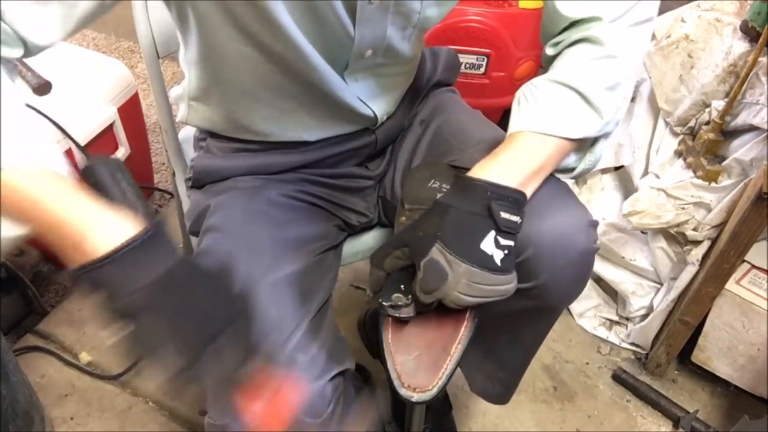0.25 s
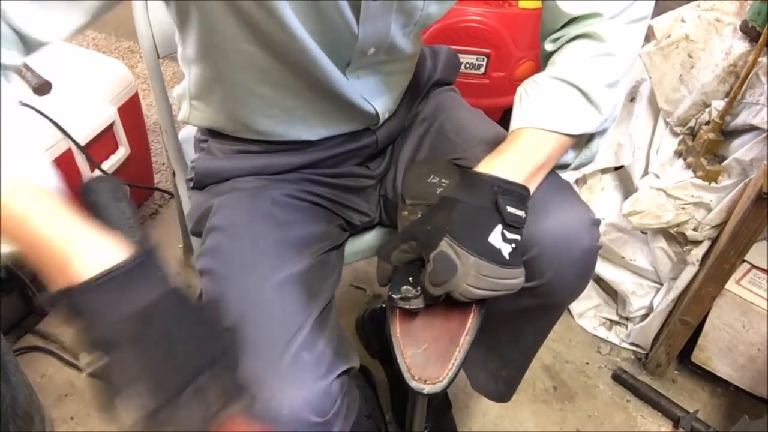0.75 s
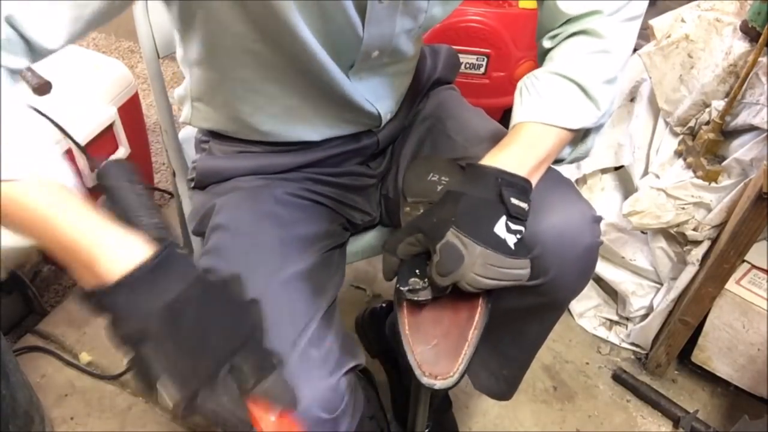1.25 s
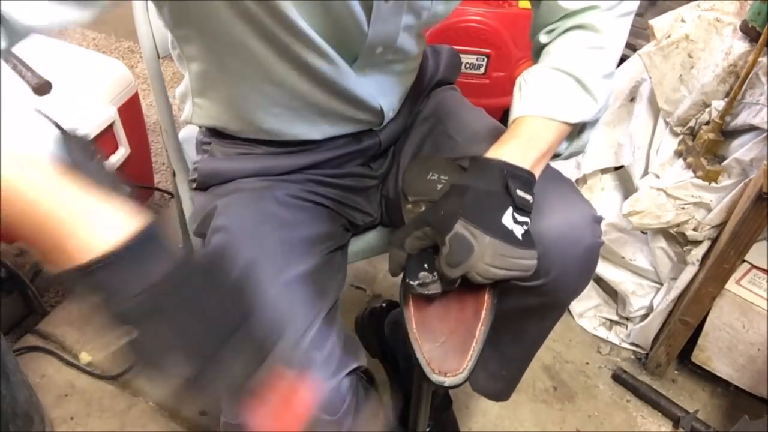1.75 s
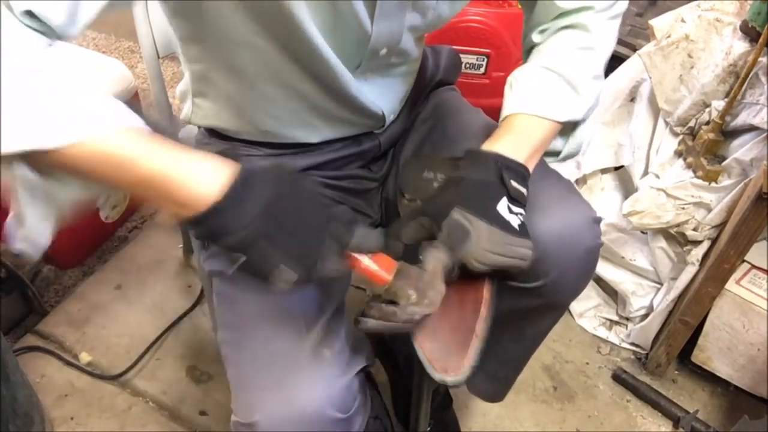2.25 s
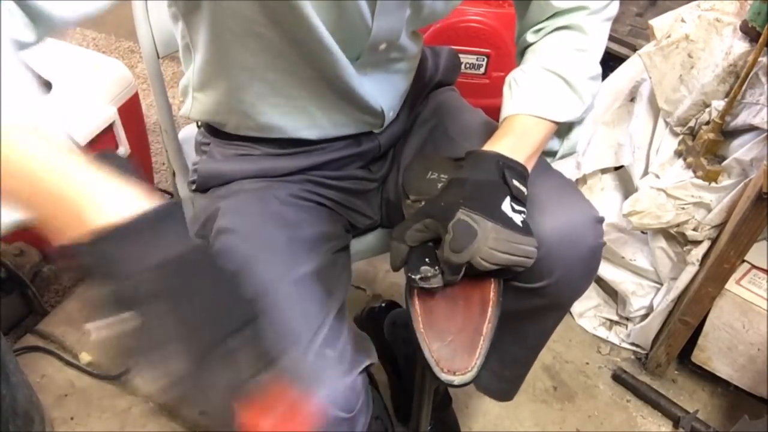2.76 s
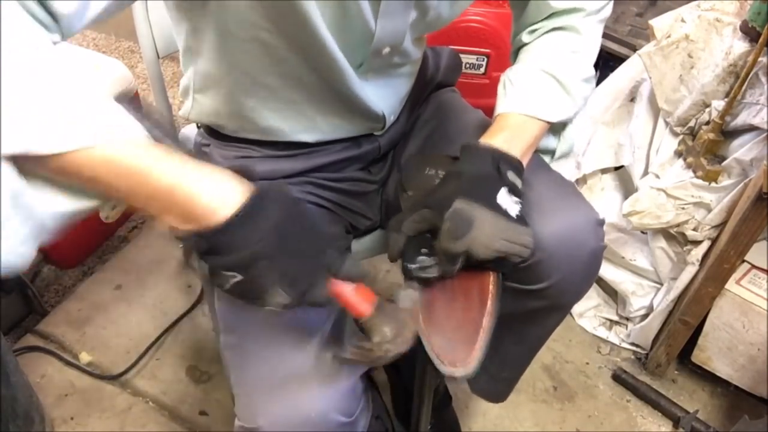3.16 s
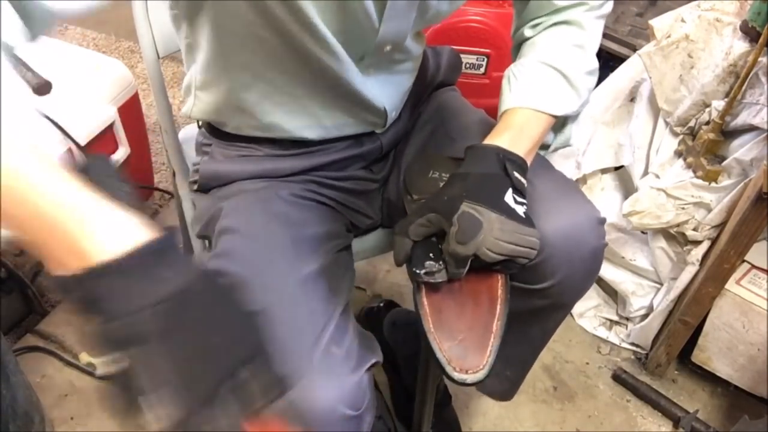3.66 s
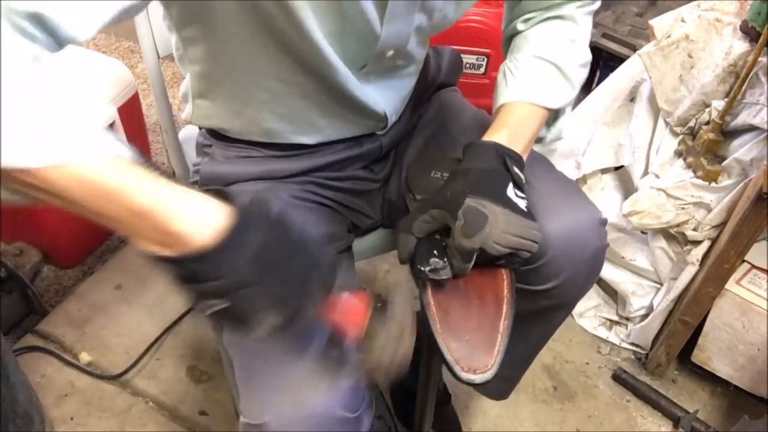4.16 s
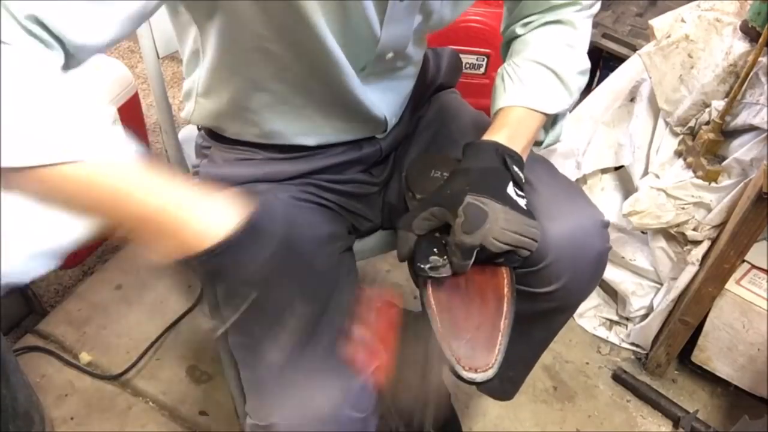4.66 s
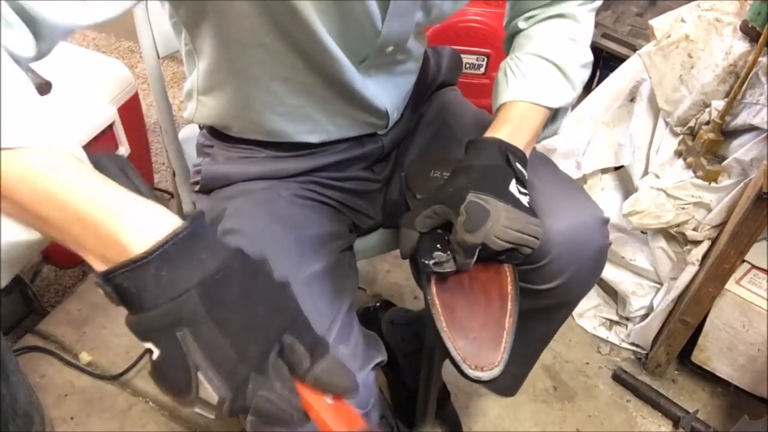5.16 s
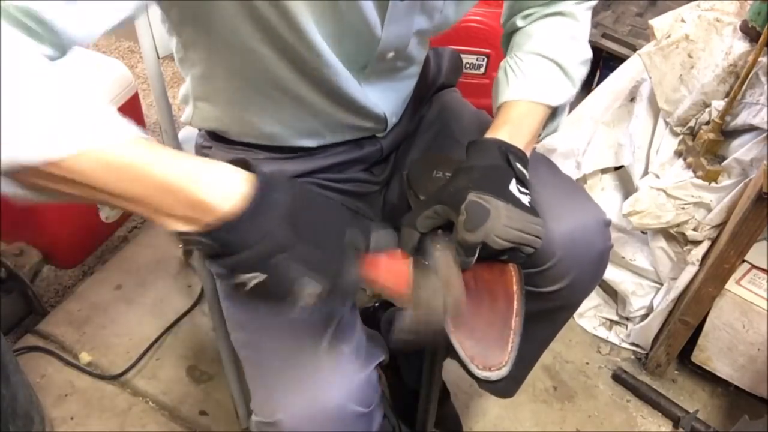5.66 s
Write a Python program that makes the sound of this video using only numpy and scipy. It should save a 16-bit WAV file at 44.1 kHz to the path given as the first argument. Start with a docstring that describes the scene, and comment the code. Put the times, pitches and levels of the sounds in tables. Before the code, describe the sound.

Steady hammering of metal on metal, close up in a small hard workshop, continuing from start to end. Blows differ in pitch and force: some clack dully, others clang higher with a thin ping. The hollow shoe knocks underneath, with a faint low thump from its stand. Short reverberation fades almost to quiet room hiss before the next blow.

```python
"""A hammer beats the handle of a steel spatula wedged under a shoe heel, three or four blows a second,
in a small workshop. Each blow is a few ms of chattering contact, modelled as filtered noise bursts.
It drives decaying modes of the blade; modes of the hammer head, the hollow shoe and its low stand follow
a moment later. The walls return it all as band-wise decaying noise over a faint room hiss."""
import sys
import numpy as np
from scipy import signal
from scipy.fft import rfft, irfft
from scipy.io import wavfile

SR = 44100
rng = np.random.default_rng(int(sys.argv[2]) if len(sys.argv) > 2 else 0)


def pcm_store(signal):
    """Save signal as 16-bit PCM."""
    levels = np.round(np.clip(np.atleast_2d(signal), -1, 1) * 32767)
    wavfile.write(sys.argv[1], SR, levels.astype(np.int16).T)


def level_to_linear(level):
    """Convert decibel levels to linear amplitude factors, elementwise."""
    exponent = np.asarray(level, float) / 20
    return 10 ** exponent


N = 259943  # length of the scene [samples]
RING_S = 0.4  # time allowed for each blow and its echo
TIME = np.arange(int(RING_S * SR)) / SR


def colour(x, points):
    """Minimum-phase filtering: a causal response from the folded cepstrum of a (Hz, dB) gain curve."""
    hz, db = np.transpose(points)
    log_hz = np.log(np.fft.rfftfreq(2048, 1 / SR) + 1)
    cepstrum = irfft(np.log(level_to_linear(np.interp(log_hz, np.log(hz), db))))
    # folding the negative times onto the positive ones makes the response causal
    cepstrum[1:1024] *= 2
    cepstrum[1025:] = 0
    response = irfft(np.exp(rfft(cepstrum)))
    return signal.fftconvolve(x, response)[:len(x)]


def loud(x, db):
    """Onset level: scale so that the first 12 ms have this rms level."""
    onset = x[:int(0.012 * SR)]
    return x * level_to_linear(db) / np.sqrt(np.mean(onset ** 2))


def ring(modes, scatter_db, detune):
    """Modal superposition: decaying sines; each blow lands a little elsewhere, so shares and pitches vary."""
    hz, db, t60 = np.array(modes, float).T[:, :, None]
    level_luck, pitch_luck = rng.standard_normal((2, len(modes), 1))
    sign = (-1.0) ** np.arange(len(modes))[:, None]
    gain = sign * level_to_linear(db + scatter_db * level_luck)
    wave = np.sin(2 * np.pi * hz * (1 + detune * pitch_luck) * TIME)
    decay = 1000.0 ** (-TIME / t60)
    return np.sum(gain * wave * decay, axis=0)


def late(x, lag_s, push_s):
    """Propagation and contact time: delay by the travel through the tool, soften by a push of push_s."""
    push = np.hanning(int(push_s * SR) + 3)
    response = np.r_[np.zeros(int(lag_s * SR)), push / push.sum()]
    return np.convolve(x, response)[:len(x)]


def chatter(spread_db, rise_s, hold_s):
    """Steel on steel: dense uneven micro-contacts that bite within rise_s and die over hold_s."""
    uneven = level_to_linear(spread_db * rng.exponential(size=len(TIME)))
    contacts = uneven * rng.standard_normal(len(TIME))
    bite = (TIME / rise_s) ** 2 / (1 + (TIME / rise_s) ** 2)
    return contacts * bite * np.exp(-TIME / hold_s)


def hiss():
    """Stationary noise: the steady room and microphone noise is white noise given a fixed spectrum."""
    # noise spectrum: (frequency [Hz], relative density [dB per Hz])
    hiss_spectrum = [(18, -35), (30, 12), (153, -11.5), (266, -5.5), (437, -3), (866, -9.5), (2170, -3.5),
                     (4190, -9), (6380, -8), (7270, -15.5), (16000, -33.5)]
    hiss_db = -58.5  # rms level
    x = colour(rng.standard_normal(N), hiss_spectrum)
    return x * level_to_linear(hiss_db) / x.std()


def walls():
    """Diffuse reverberation: dense reflections as noise, each band decaying at its own rate."""
    # reverberation of the walls: (band centre [Hz], relative level [dB], decay by 60 dB [s])
    wall_bands = [(86.4, -7, 0.86), (200.7, -0.5, 0.37), (348, -12, 0.21), (624, -6.5, 0.34),
                  (1365, -4, 0.35), (2920, -8.5, 0.36), (6520, -7.5, 0.33), (8100, -9.5, 0.15),
                  (13600, -6.5, 0.26)]
    # a fresh noise pattern is drawn for every blow's echo
    reflections = 0
    for hz, db, t60 in wall_bands:
        edges = [hz / 1.42, min(hz * 1.42, 0.45 * SR)]
        sos = signal.butter(2, edges, "bandpass", fs=SR, output="sos")
        band = signal.sosfilt(sos, rng.standard_normal(len(TIME))) * 1000.0 ** (-TIME / t60)
        # division by the summed decay keeps long and short bands comparable
        reflections = reflections + level_to_linear(db) * band / np.sqrt(SR * t60 / np.log(1e6))
    arrival = 1 - np.exp(-(TIME / 0.0045) ** 2)
    # bench and clutter close by add a quick first wave
    first_wave = 1 + level_to_linear(8) * np.exp(-TIME / 0.0045)
    return reflections * arrival * first_wave


def ring_stand(thump_db, hum_db):
    """Low structural modes: the stand rocks on the floor and rings, set going by a soft, late push."""
    # rocking on the floor: (frequency [Hz], relative level [dB], decay by 60 dB [s])
    rocking_modes = [(69, -6, 0.1), (113, -11.5, 0.097)]
    # ringing of the stand: (frequency [Hz], relative level [dB], decay by 60 dB [s])
    humming_modes = [(155.7, -11, 0.19), (228, -1.5, 0.012)]
    thump = loud(ring(rocking_modes, 1.23, 0.059), thump_db)
    hum = loud(ring(humming_modes, 1.0, 0.0061), hum_db)
    return late(thump + hum, lag_s=0.0031, push_s=0.0028)


def ring_shoe(shoe_db, shoe_hz):
    """Shell modes and cavity resonance: the hollow shoe and its air thud together after a short delay."""
    # shell of the shoe: (multiple of the blow's pitch [ratio], relative level [dB], decay by 60 dB [s])
    shell_modes = [(1, 0, 0.037), (.76, -4, 0.024), (1.2, 2, 0.012)]
    # air in the shoe: (frequency [Hz], relative level [dB], decay by 60 dB [s])
    air_mode = (445, -4.5, 0.093)
    modes = [(ratio * shoe_hz, db, t60) for ratio, db, t60 in shell_modes] + [air_mode]
    shoe = ring(modes, 1.0, 0.004)
    # a small open body radiates little below its pitch
    shoe = signal.sosfilt(signal.butter(2, 190, "highpass", fs=SR, output="sos"), shoe)
    return late(loud(shoe, shoe_db), lag_s=0.00377, push_s=0.0018)


def ring_head(off_mm):
    """Mode driving by position: a centred hit leaves the hammer head dumb, an off-centre one rings it."""
    # hammer head: (frequency [Hz], decay by 60 dB [s], level at 1 mm off centre towards the handle [dB],
    #               level at 1 mm off centre away from the handle [dB])
    head_modes = [(6190, 0.097, -33, -56), (6533, 0.053, -33.5, -33.5)]
    head = 0
    for hz, t60, near_db, far_db in head_modes:
        # both sides ring the upper mode; landings towards the handle (negative) also ring the lower one
        side_db = near_db if off_mm < 0 else far_db
        head = head + ring([(hz, side_db, t60)], 0, 0.00011)
    return late(abs(off_mm) * head, lag_s=0.000917, push_s=0.00005)


def ring_blade(blade_db, favoured_hz):
    """Impact excitation of a plate: a brief chatter drives blade modes, most those near the favoured pitch."""
    # blade, damped by glove and leather: (frequency [Hz], relative level [dB], decay by 60 dB [s])
    blade_modes = [(813.5, -8.5, 0.07), (1116, -0.5, 0.039), (1245, 5, 0.017), (1396, 2, 0.011),
                   (1796, -3, 0.052), (2037, 4, 0.014), (2218, -7, 0.05), (2440, -11, 0.025),
                   (2666, 2, 0.012), (2670, -11, 0.11), (2935, -7, 0.058), (3370, 1, 0.018),
                   (3080, -39, 0.046), (4080, -3, 0.013), (4590, -6.5, 0.029), (5100, -24.5, 0.048),
                   (5650, -6.5, 0.026), (7750, -19, 0.16)]
    # where the hammer lands decides which modes are driven hardest
    struck = []
    for hz, db, t60 in blade_modes:
        octaves_away = np.log2(hz / favoured_hz)
        struck.append((hz, db + 10 * np.exp(-(octaves_away / 0.12) ** 2), t60))
    drive = chatter(spread_db=2.5, rise_s=0.0003, hold_s=0.0002)
    return loud(signal.fftconvolve(drive, ring(struck, 2.62, 0.0088))[:len(TIME)], blade_db)


def contact_spectrum(bright):
    """Spectral tilt: the colour of the crack, turned about 4 kHz by bright dB per octave."""
    # colour of the crack: (frequency [Hz], relative density [dB per Hz])
    crack_colour = [(120, -42), (300, -60.5), (700, -1), (1200, -5), (2500, 3.5), (4000, 0), (6000, 0),
                    (7500, -7.5), (9500, -10), (10400, -13.5), (11500, -11), (15500, -20)]
    return [(hz, db + bright * np.log2(hz / 4000)) for hz, db in crack_colour]


def clang(x, favoured_hz):
    """Resonant emphasis: the contact clangs around the part of the blade that the blow favours."""
    return colour(x, [(favoured_hz / 1.045, 0), (favoured_hz, 8), (favoured_hz * 1.02, 0)])


def strike_crack(blow_db, spectrum, favoured_hz, rebound_s):
    """Repeated contact: the tool bounces in its seat, so chatter comes in bursts one rebound apart."""
    swing = np.cos(2 * np.pi * (TIME - 0.0008) / rebound_s)
    bursts = level_to_linear(5.0 * swing * np.exp(-TIME / 0.017))
    contact = bursts * chatter(spread_db=2.0, rise_s=0.0006, hold_s=0.014)
    return clang(loud(colour(contact, spectrum), blow_db - 20.0), favoured_hz)


def strike_tick(blow_db, spectrum, favoured_hz, rebound_s):
    """Short hard contact: the faces first meet very briefly; differencing the chatter brightens it."""
    contact = np.diff(chatter(spread_db=5.0, rise_s=0.00048, hold_s=0.00097), prepend=0)
    tick = loud(colour(contact, spectrum), blow_db - 19.0)
    # the tool rebounds once, a little duller, as the heel gives
    tick = tick + level_to_linear(-10.5) * late(tick, rebound_s, 0.0001)
    return clang(tick, favoured_hz)


def follow_blow(blow_db, shoe_db):
    """Excitation laws: harder blows drive blade, hum and echo more; louder shoes go with a duller crack."""
    # each law: (value for the usual blow [dB], gain per dB of harder blow [dB/dB],
    #            gain per dB of louder shoe [dB/dB]); for brightness, dB per octave replaces dB
    blade_law = (-25, 0.27, -0.003)
    hum_law = (-40.5, 0.54, -0.028)
    echo_law = (-0.67, 0.18, -0.021)
    bright_law = (0.43, -0.26, -0.043)
    harder_db = blow_db - -5  # over the usual blow
    louder_db = shoe_db - -24  # over the usual shoe
    return [usual + per_blow * harder_db + per_shoe * louder_db
            for usual, per_blow, per_shoe in (blade_law, hum_law, echo_law, bright_law)]


def blow(blow_db, shoe_db, shoe_hz, thump_db, favoured_hz, off_mm):
    """Superposition: contact, blade, hammer head, shoe and stand add up, then excite the walls."""
    blade_db, hum_db, echo_db, bright = follow_blow(blow_db, shoe_db)
    spectrum = contact_spectrum(bright)
    rebound_s = 0.0035 * (1 + 0.12 * rng.standard_normal())
    crack = strike_crack(blow_db, spectrum, favoured_hz, rebound_s)
    tick = strike_tick(blow_db, spectrum, favoured_hz, rebound_s)
    blade = ring_blade(blade_db, favoured_hz)
    head = ring_head(off_mm)
    bodies = ring_shoe(shoe_db, shoe_hz) + ring_stand(thump_db, hum_db)
    # the walls gather the crack from all directions, so its chance peaks average into the smooth colour
    impulse = 1.0 * (TIME == 0)
    smooth_crack = clang(loud(colour(impulse, spectrum), blow_db - 13), favoured_hz)
    to_walls = smooth_crack + level_to_linear(-1.5) * blade + level_to_linear(-1) * head + level_to_linear(-1) * bodies
    echo = level_to_linear(echo_db) * signal.fftconvolve(to_walls, walls())[:len(TIME)]
    return crack + tick + blade + head + bodies + echo


def scene():
    """Linear superposition in time: every blow is added at its moment, over the hiss."""
    # the blows: (time [s], relative blow level [dB], shoe level [dB], shoe pitch [Hz],
    #             stand thump level [dB], favoured blade pitch [Hz],
    #             landing off the centre of the hammer face [mm, negative towards the handle])
    blow_list = [(-0.047, -12.5, -31, 442, -44, 5130, -3), (0.2069, -7.5, -26, 465, -53, 2970, -2.5),
                 (0.4641, -7, -26.5, 439, -43, 2150, 4), (0.7254, -6.5, -33, 420, -36, 3030, -1.5),
                 (0.9853, -5.5, -28, 432, -47.5, 3190, 5), (1.234, -6.5, -23.5, 433, -43, 5230, 3.5),
                 (1.4894, -7, -23, 440, -46, 4300, -2), (1.777, -7, -24, 443, -46, 4990, 4),
                 (2.071, -6, -24.5, 452, -40.5, 2290, 10.5), (2.365, -4.5, -24, 426, -48, 2790, -1.5),
                 (2.682, -5, -19.5, 441, -54, 5690, 0), (2.981, -5, -21, 462, -48, 5140, 3.2),
                 (3.2845, -5, -27, 452, -38.5, 3330, 0.5), (3.594, -5, -26, 446, -50, 2960, 1.6),
                 (3.898, -3.5, -20, 408, -44, 1404, 2.5), (4.237, -8, -19, 387, -53.5, 1445, -4.5),
                 (4.529, -5.5, -20, 448, -44.5, 2440, 1.8), (4.831, -6, -24.5, 470, -44, 2930, 2),
                 (5.1174, -7.5, -17.5, 407, -46, 4970, 3), (5.421, -8, -21.5, 452, -42.5, 1420, -3.5),
                 (5.7278, -4.5, -21.5, 410, -45.5, 2430, 2.5)]
    lead = int(0.1 * SR)  # room for a blow that falls before time zero
    out = np.zeros(lead + N + len(TIME))
    for time_s, *how in blow_list:
        at = lead + int(time_s * SR)
        out[at:at + len(TIME)] += blow(*how)
    return (out[lead:lead + N] + hiss())[None]


def roll_off(x):
    """The treble ends steeply here."""
    return signal.sosfilt(signal.butter(12, 16960, fs=SR, output="sos"), x)


def record(dry):
    """Band limits and saturation: the microphone rolls off deep bass and rounds peaks; little passes 16 kHz."""
    # upper limit of the band: (frequency [Hz], gain [dB])
    top_cut = [(15700, 0), (15900, -8), (16500, -14), (16800, -50), (17500, -70)]
    x = signal.sosfilt(signal.butter(2, 45, "highpass", fs=SR, output="sos"), dry[0])
    rounded = np.tanh(1.608 * x) / 1.353
    mix = colour(rounded, top_cut)[None]
    return roll_off(mix)


dry = scene()
out = record(dry)
pcm_store(out)
```